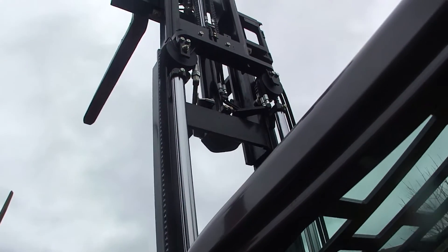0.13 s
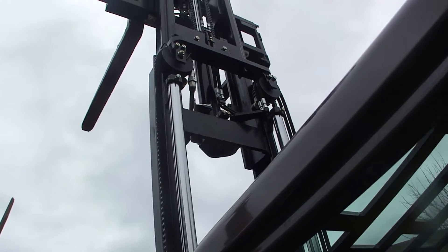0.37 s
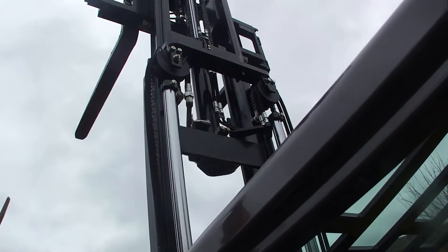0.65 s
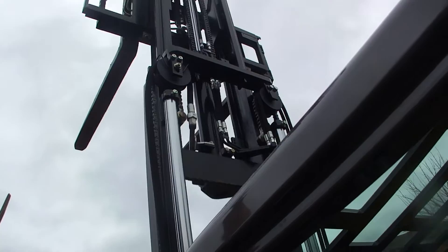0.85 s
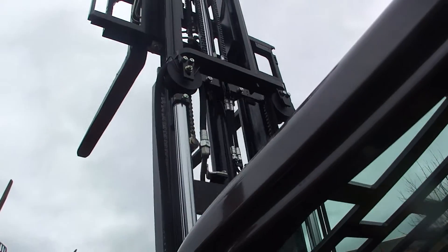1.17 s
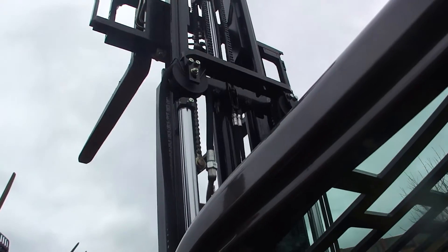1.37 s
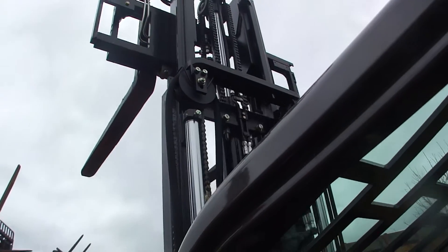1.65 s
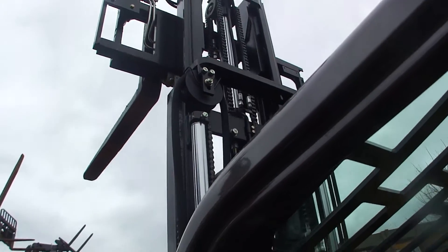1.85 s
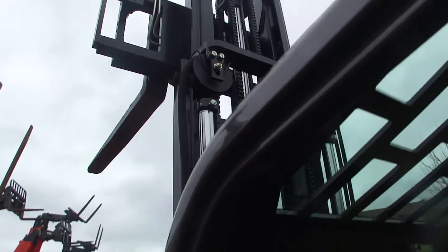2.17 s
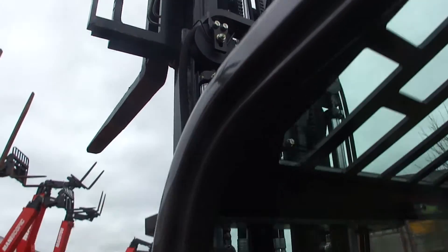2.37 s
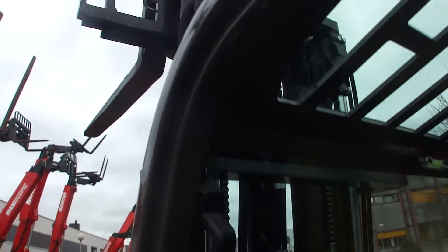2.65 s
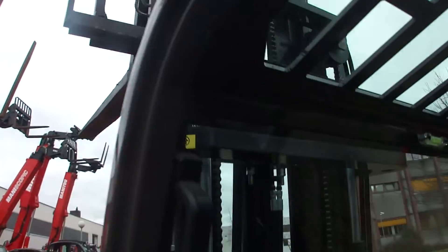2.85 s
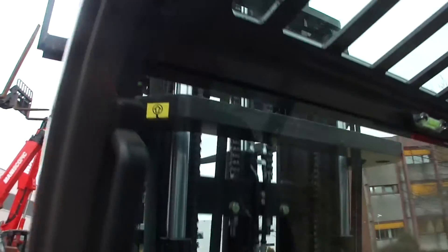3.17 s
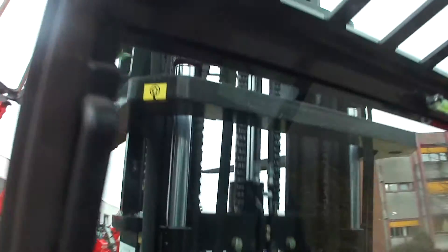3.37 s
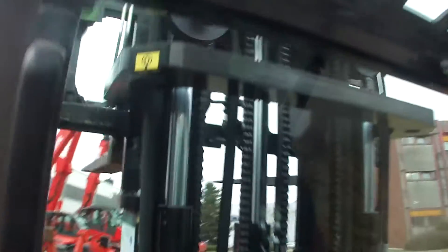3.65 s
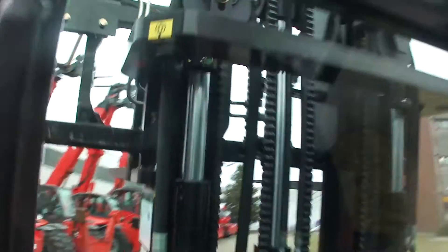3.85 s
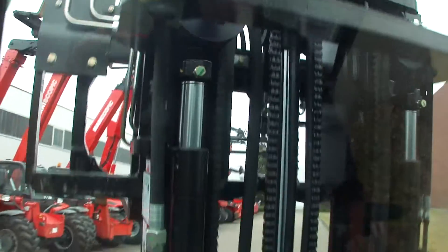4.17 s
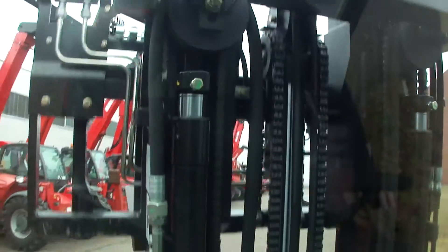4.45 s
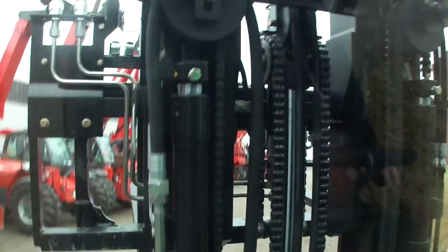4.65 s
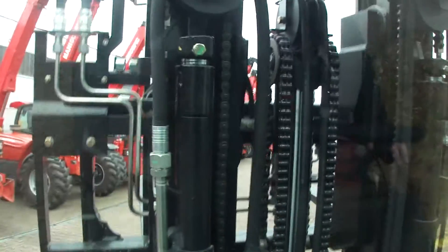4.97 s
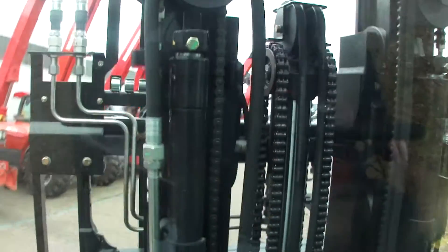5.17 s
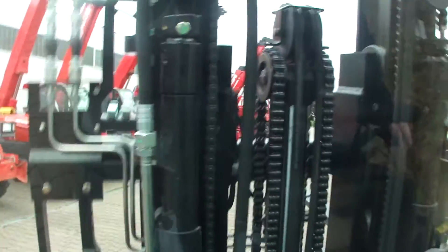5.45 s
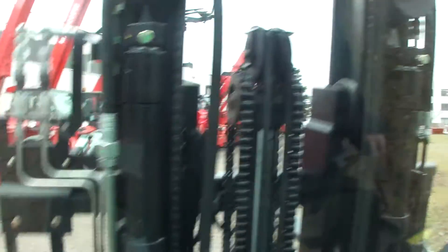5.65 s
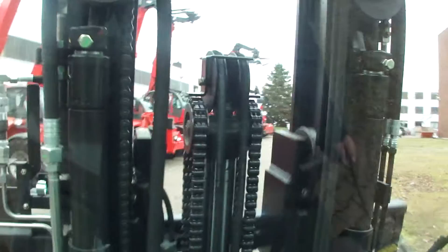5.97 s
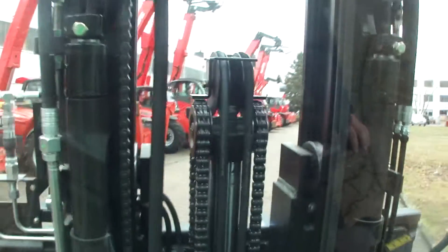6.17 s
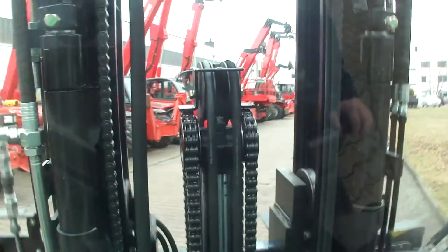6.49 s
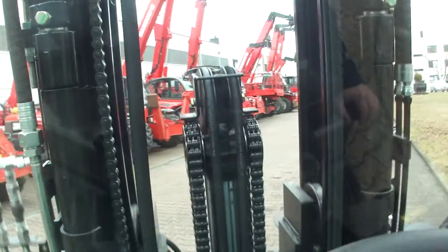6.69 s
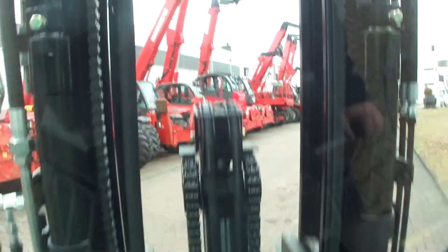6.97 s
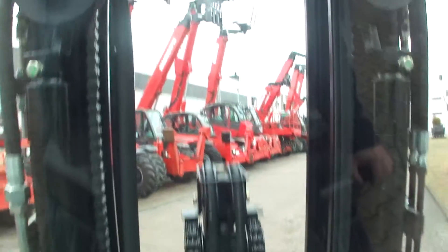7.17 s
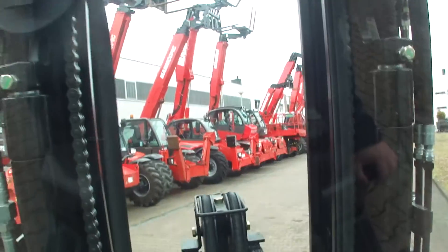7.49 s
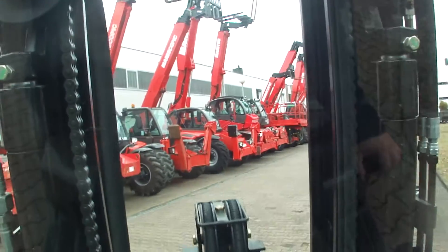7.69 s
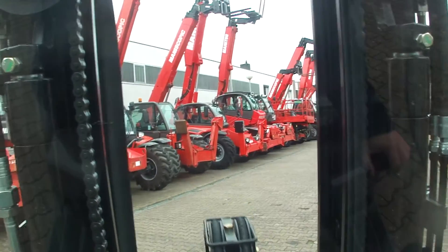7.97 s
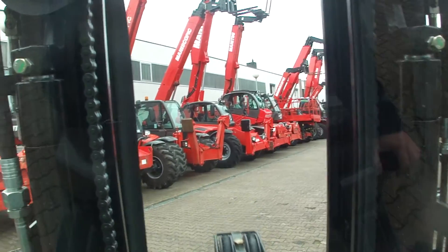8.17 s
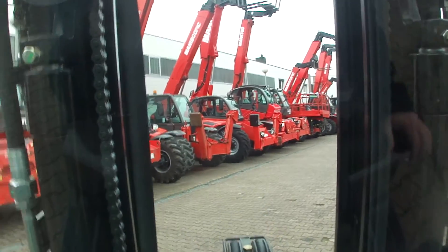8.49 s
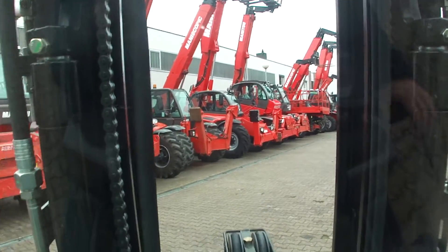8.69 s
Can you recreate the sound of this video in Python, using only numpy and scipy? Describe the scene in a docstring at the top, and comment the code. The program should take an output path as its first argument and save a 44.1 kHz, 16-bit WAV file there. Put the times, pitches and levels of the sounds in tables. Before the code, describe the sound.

Inside a forklift cab, a diesel engine drones and clatters while a panel knocks. The engine sags, the mast clanks once, then the engine pulls steadily under a hydraulic whine, faint oil hiss and small ticks. Midway it drops briefly to idle and picks up as a finger rubs and taps the hand-held microphone, dulling the right side. The mast whirs, and the engine revs higher in two steps.

```python
"""A diesel drone with clatter and a knocking panel fills a forklift's cab. The four-cylinder engine sags,
pulls, drops to idle and is revved again in steps; its tones and impacts are locked to the crankshaft.
The hydraulic pump whines, oil hisses in the valves, and the mast clanks, ticks and whirs. After five
seconds a finger slides over the right port of the hand-held camera, shading it and rubbing the case."""
import sys
import numpy as np
from scipy import signal
from scipy.fft import rfft, irfft
from scipy.io import wavfile
from scipy.ndimage import uniform_filter1d

SR = 44100
rng = np.random.default_rng(int(sys.argv[2]) if len(sys.argv) > 2 else 0)


def wav_out(sig):
    """Save sig, one row per channel (or a flat mono array), as 16-bit PCM at SR to the path in sys.argv[1]."""
    wavfile.write(sys.argv[1], SR, np.round(np.clip(np.atleast_2d(sig).T, -1, 1) * 32767).astype(np.int16))


N = 389399
TIME = np.arange(N) / SR
WORKING_HZ = 55  # firing rate at working speed

# Engine speed. Each row: time in seconds, firing rate in Hz.
FIRING_RATE = [(0, 50.2), (.16, 41.8), (.7, 42), (.92, 43.5), (1.13, 54.3), (1.5, 54.95), (2.3, 57),
               (3, 57.4), (4.57, 57.7), (4.93, 33.5), (5.14, 29.8), (5.37, 51.1), (6, 50.7), (7.62, 50.95),
               (7.83, 58.3), (8.32, 58.9), (8.6, 73.4), (8.83, 72.6)]
# Strain on the engine, high while the mast is worked. Each row: time in seconds, load in dB.
ENGINE_LOAD = [(0, -1.5), (1.2, 0), (2.4, -0.5), (3.3, -5), (4.8, -8.5), (5.15, -10.5), (7.6, -30),
               (8.2, -5), (8.83, -24)]
# Extra rumble as the truck gets rolling. Each row: time in seconds, gain in dB.
ROLLING_GAIN = [(0, 2.5), (3, -3.5), (4.9, 2), (5.7, 4), (7.1, 6.5), (8.4, 3.5), (8.83, -1)]
# Hiss of the oil flow. Each row: time in seconds, level in dB.
OIL_FLOW = [(0, -46), (1.1, -46), (2.7, -47), (3.4, -46), (3.9, -43.5), (4.6, -43.5), (5.05, -48),
            (5.6, -45), (7.2, -44), (8.83, -44)]


def undb(db):
    """Decibels to amplitude ratio."""
    return 10 ** (np.asarray(db) / 20)


def curves(table):
    """Linear interpolation in time of each column after the first."""
    times, *columns = np.transpose(table)
    return [np.interp(TIME, times, column) for column in columns]


def unit(x):
    """Normalisation to rms 1."""
    return x / np.sqrt(np.mean(x ** 2))


def colour(x, points):
    """Minimum-phase filter shaped by (Hz, dB) points; it keeps the power of white noise."""
    hz, db = np.transpose(points)
    size = 4096
    grid = np.maximum(np.fft.rfftfreq(size, 1 / SR), 1)
    rolloff_db = 20 * np.maximum(np.log2(grid / hz[-1]), 0)
    cepstrum = irfft(np.log(undb(np.interp(np.log(grid), np.log(hz), db) - rolloff_db)))
    cepstrum[1:size // 2] *= 2
    cepstrum[size // 2 + 1:] = 0
    response = irfft(np.exp(rfft(cepstrum)))
    return signal.oaconvolve(x, response[None] / np.linalg.norm(response), axes=1)[:, :N]


def walk(rate):
    """Slow fluctuation: random levels held 1 / rate seconds and smoothed twice; spread near 1."""
    hold = int(SR / rate)
    steps = np.repeat(rng.standard_normal(N // hold + 1), hold)
    return 1.72 * uniform_filter1d(uniform_filter1d(steps, hold), hold)[:N]


def noise(apart):
    """Partly coherent white noise at two ports; apart weights what they do not share."""
    return unit(rng.standard_normal(N) + apart * rng.standard_normal((2, N)))


def swells(table):
    """Gaussian envelopes; a half length is one standard deviation."""
    return sum(undb(db) * np.exp(-.5 * ((TIME - s) / half) ** 2) for s, half, db in table)


def blows(table):
    """Sudden onsets with exponential decay, 60 dB in one ring time."""
    return sum(undb(db - 60 * np.maximum(TIME - s, 0) / t60) * (TIME >= s) for s, db, t60 in table)


def tone(turns, db, wander):
    """Phase modulation: a sine of the given rms level, offset by wander in turns."""
    return np.sqrt(2) * undb(db) * np.sin(2 * np.pi * (turns + rng.random() + wander))


def resonate(x, hz, width):
    """Two equal resonators in cascade, scaled to rms 1."""
    mode = signal.iirpeak(hz, hz / width, SR)
    return unit(signal.lfilter(*mode, signal.lfilter(*mode, x)))


def octaves():
    """Engine speed in octaves above working speed."""
    return np.log2(curves(FIRING_RATE)[0] / WORKING_HZ)


def locked(order):
    """Nearest order (multiple of the firing rate) that is a harmonic of the four-firing cycle."""
    return np.round(order * 4) / 4


def impacts(cycle, scatter_db, slop_s, count):
    """Quasi-periodic impacts: parts strike at set angles of the cycle, with scatter in force and time."""
    drift = .15  # random step of the pattern per cycle, radians
    angle = (np.arange(count) + rng.random(count)) / count
    turns = np.arange(int(cycle[-1]))[:, None] + angle
    pattern = 2 * np.pi * rng.random(count) + drift * np.cumsum(rng.standard_normal(turns.shape), axis=0)
    at = (np.interp(turns, cycle, TIME) + slop_s * rng.standard_normal(turns.shape)) * SR
    force = np.tanh(2 * np.cos(pattern)) * undb(scatter_db * rng.standard_normal(turns.shape))
    train = np.zeros(N)
    np.add.at(train, np.clip(at.astype(int), 0, N - 1), force)
    return unit(train)


def engine_noise(firing):
    """Impact noise, amplitude-modulated by the firings: cab rumble, combustion clatter, injector rasp."""
    # Three spectra. Each row: frequency in Hz, relative level in dB.
    rumble_spectrum = [(30, -64.5), (70, -30.5), (135, -19), (175, -1.5), (235, 0), (310, -2), (420, -6.5),
                       (520, -20.5), (800, -40)]
    clatter_spectrum = [(50, -67.5), (300, -37), (440, -6), (560, -1.5), (680, -7.5), (790, -1.5),
                        (950, -8.5), (1150, -13.5), (1700, -56)]
    rasp_spectrum = [(100, -69), (700, -31), (1020, -2), (1350, -1.5), (1600, -4.5), (1950, -5.5),
                     (2350, -14.5), (2800, -23), (3500, -33.5), (4700, -35.5), (7000, -71)]
    speed, load_db, flow_db = octaves(), curves(ENGINE_LOAD)[0], curves(OIL_FLOW)[0]
    rumble_db = -25 + 9.5 * speed + curves(ROLLING_GAIN)[0] * (1 + .25 * walk(25))
    clatter_db = -24.5 + 3 * speed + .036 * load_db
    rasp_db = -29 - 1.5 * speed + .54 * (flow_db - flow_db.mean()) + .11 * load_db
    throb = 1 + .11 * np.cos(2 * np.pi * firing)
    rumble = noise(.069) + .5 * impacts(firing / 4, scatter_db=3.5, slop_s=.0004, count=16)
    clatter = noise(.45) + 1.35 * impacts(firing / 4, scatter_db=3.3, slop_s=.00005, count=24)
    rasp = noise(.9) + 1.15 * impacts(firing / 4, scatter_db=2.2, slop_s=.00003, count=64)
    return (unit(colour(throb * rumble, rumble_spectrum)) * undb(rumble_db)
            + unit(colour(throb * clatter, clatter_spectrum)) * undb(clatter_db)
            + unit(colour(throb * rasp, rasp_spectrum)) * undb(rasp_db))


def cab_resonance_db(order):
    """Cavity resonance: the cab's air modes lift an engine order that passes through them."""
    # Each row: frequency in Hz, half width in Hz, lift in dB.
    air_modes = [(103.9, 3.8, 7.5), (152.7, 6, 8), (198, 18, 6), (313.7, 39, 13), (600, 46, 9)]
    rates = np.arange(25, 80, .25)
    lift = sum(db * np.exp(-.5 * ((order * rates - hz) / half) ** 2) for hz, half, db in air_modes)
    return np.interp(curves(FIRING_RATE)[0], rates, lift)


def drones(firing):
    """Periodic forcing: firing harmonics and the pump's tone grow with speed and waver as it changes."""
    # Each row: order, base level in dB, rise in dB per octave of speed.
    firing_orders = [(1, -55.5, 28), (2, -44, 15.5), (3, -46, 0.5), (6, -36, 6), (12, -37.5, 11)]
    # Least unsteadiness of the tones. Each row: time in seconds, amount from 0 to 1.
    unsteadiness = [(0, .55), (1.05, .55), (1.3, .05), (4.55, 0), (4.75, .35), (5.2, .35), (5.4, .05),
                    (6.6, .05), (7.5, .2), (7.9, .5), (8.83, .7)]
    # The camera moves through the cab's standing waves.
    # Each row: time in seconds, then lift in dB of order 6, of order 12 and of the pump's tone.
    standing_waves = [(0, -14, 6, -1), (1.05, -4, 3, 2.5), (1.25, -1, 2, -1), (2.3, -1, 2, -0.5),
                      (2.9, 3, 8, 3), (3.7, 3.5, -10, 0.5), (4.6, -0.5, 2.5, -12), (5.1, 9.5, -6, -2),
                      (5.4, 4, -1, 6), (6.5, 3.5, 1.5, 6.5), (7.1, -3.5, 3, 5), (7.58, -1, 4.5, 0),
                      (7.7, -8, -5, 3), (7.8, 3.5, 1, 7), (8.3, 2.5, 3, 7.5), (8.55, 1, -3, 5.5),
                      (8.83, 5.5, -3, -2)]
    pump_order, speed = 4.385, octaves()
    hz_per_s = np.abs(np.gradient(curves(FIRING_RATE)[0])) * SR
    surge = np.tanh(uniform_filter1d(hz_per_s, size=4000) / 40)
    rough = np.maximum(.5 * surge, curves(unsteadiness)[0])
    sixth_db, twelfth_db, pump_db = curves(standing_waves)
    lift_db = {2: .49 * curves(ROLLING_GAIN)[0], 6: sixth_db, 12: twelfth_db}
    voices = [(order, db + rise_db * speed + cab_resonance_db(order) + lift_db.get(order, 0))
              for order, db, rise_db in firing_orders]
    voices.append((pump_order, -33 + 6 * speed + pump_db + 2 * walk(6)))
    sound = 0
    for order, db in voices:
        flutter_db = (.6 + 3 * rough) * np.tanh(walk(28))
        wander = (.025 + .08 * rough) * min(order / 6, 1) * walk(30)
        sound += tone(order * firing, db + flutter_db, wander)
    return sound


def singing_tones(firing):
    """Forced vibration: engine tones and the pump's overtone sing under load; some swell."""
    # Each row: order, base level in dB at full load. Order 8.75 is the pump's second harmonic.
    singing_orders = [(8.75, -37), (9.5, -39.5), (10, -47.5), (10.5, -42), (10.75, -44), (11, -41),
                      (11.5, -42), (13.25, -40.5), (14, -35.5), (15.25, -39.5), (16, -45.5), (20, -54)]
    # Passing whines. Each row: centre and half length in seconds, order, level in dB.
    whines = [(.5, .39, 4, -36), (1, 0.17, 8.75, -30), (1.5, .3, 11, -33), (1.5, .3, 12, -39),
              (2.35, 0.34, 24, -36), (2.3, 0.31, 10.5, -27.5), (2.5, 0.19, 18, -33.5), (2.6, .35, 11, -32),
              (2.6, 0.33, 13.25, -33), (2.7, 0.57, 8.75, -30.5), (3.3, 0.85, 9.75, -29),
              (3.55, 0.37, 24, -33.5), (3.8, 0.37, 19, -35), (3.8, 0.35, 15.25, -34), (4, .4, 13, -38),
              (4, .35, 20, -41), (3.85, 0.12, 60, -58), (4.1, 0.59, 36, -41.5), (4.4, 0.12, 24, -36),
              (4.947, .092, 19.5, -32), (6.3, 0.26, 39, -40), (6.2, 0.45, 27, -43), (6.3, 0.65, 17.25, -36),
              (6.4, .8, 10.5, -39), (6.8, .8, 4, -37), (6.9, .5, 18, -43), (8.12, 0.18, 10.5, -32),
              (8.47, .043, 4, -21.5), (8.8, 0.049, 4, -26)]
    drive_db = .35 * curves(ENGINE_LOAD)[0] - 39 * octaves() ** 2  # strongest near working speed
    power = {locked(order): undb(db + drive_db + cab_resonance_db(locked(order))) ** 2
             for order, db in singing_orders}
    for s, half, order, db in whines:
        power[locked(order)] = power.get(locked(order), 0) + swells([(s, half, db)]) ** 2
    return sum(np.sqrt(p) * tone(order * firing, db=1.3 * walk(8), wander=.06 * walk(10))
               for order, p in power.items())


def panel(firing):
    """Impact excitation: a panel, slapped hard once a cycle and lightly between, rings and buzzes."""
    # Each row: angle in turns of the cycle, relative force in dB, rise in dB per octave of speed.
    slap_pattern = [(.06, -11, 18), (.3, -8, 22), (.512, 0, 0), (.82, -13, -3)]
    # Each row: frequency in Hz, relative level in dB.
    panel_response = [(40, -73), (150, -38), (350, 1.5), (460, -3), (590, -4), (670, -19), (780, -10.5),
                      (1000, -22), (1500, -32), (3000, -59)]
    # Each row: frequency and resonator width in Hz, level at full load in dB, dB per octave of speed.
    panel_modes = [(575, 36, -34, -7), (630, 28, -35.5, -3), (600, 170, -25.5, 2.5), (800, 200, -32, 22)]
    speed, load_db = octaves(), curves(ENGINE_LOAD)[0]
    lag = .045 * speed  # turns: the slaps land later at higher speed
    slaps, rattling = 0, 0
    for angle, db, rise_db in slap_pattern:
        since = (firing / 4 - angle - lag) % 1
        force = undb(db + rise_db * speed + 1.2 * walk(25))
        slaps += force * (np.diff(since, prepend=since[0]) < 0)
        rattling += force * np.exp(-since / .1)
    buzz = unit(rattling * impacts(firing / 4, scatter_db=2.5, slop_s=.00009, count=192))
    knock = unit(unit(slaps) + .45 * buzz) * undb(-29 + 15 * speed + load_db)
    tremble = rng.standard_normal(N) * undb(-34 + .56 * load_db)
    rings = sum(resonate(slaps, hz, width) * undb(db + rise_db * speed + load_db)
                for hz, width, db, rise_db in panel_modes)
    return colour((knock + tremble)[None], panel_response) + rings


def oil_and_chain():
    """Flow noise: oil hisses in the valves; the lift chain's ticks are decaying bursts in the same band."""
    # Each row: frequency in Hz, relative level in dB.
    hiss_spectrum = [(2500, -2.5), (3400, -6), (4600, -10.5), (5700, 0.5), (7200, 2), (9000, 0),
                     (10500, -7), (11500, -20.5)]
    # Each row: start in seconds, level in dB, ring time in seconds.
    chain_ticks = [(.875, -42, .03), (1, -42, .03), (1.061, -38, 0.032), (1.735, -42, 0.043),
                   (1.89, -38, .04), (7.13, -34, .04), (7.379, -36, 0.1), (8.042, -39, 0.032)]
    hiss = noise(2.6) * (undb(curves(OIL_FLOW)[0] + .5 * walk(40)) + blows(chain_ticks))
    return colour(hiss, hiss_spectrum)


def port_notches(sound):
    """Band rejection: the camera hears the cab through three deep notches in the treble."""
    # Each row: frequency in Hz, width in Hz of each of two stages.
    notch_bands = [(3000, 300), (4020, 346), (5020, 374)]
    for hz, width in notch_bands:
        notch = signal.iirnotch(hz, hz / width, SR)
        sound = signal.lfilter(*notch, signal.lfilter(*notch, sound))
    return sound


def cab_shudder():
    """Transient response: the cab shudders in a low band at three sharp changes of speed."""
    # Each row: centre and half length in seconds, level in dB.
    shudders = [(.1, .035, -46), (4.73, .05, -34), (5.24, 0.051, -27)]
    # Each row: frequency in Hz, relative level in dB.
    shudder_spectrum = [(30, -44), (60, -20), (88, 27), (110, 5), (170, -28)]
    return colour(noise(.12) * swells(shudders), shudder_spectrum)


def valve_spurts():
    """Flow noise swells briefly as oil spurts through a valve."""
    # Each row: centre and half length in seconds, level in dB.
    spurts = [(.41, 0.039, -41), (5.24, 0.052, -44.5)]
    # Each row: frequency in Hz, relative level in dB.
    spurt_spectrum = [(4500, -16), (6000, -7), (6800, 1), (8000, -10), (11000, -25)]
    return colour(noise(.88) * swells(spurts), spurt_spectrum)


def clank_and_click():
    """Exponential decay: the mast clanks near 0.58 s; a short sharp click sounds at 1.43 s."""
    # Each row: start in seconds, level in dB, ring time in seconds.
    burst_times = [(.576, -14, .03), (.5805, -10, .008), (.583, -16.5, .08), (1.431, -24, .008)]
    # Each row: frequency in Hz, relative level in dB.
    burst_spectrum = [(40, -67), (400, -11), (750, 5), (1150, 7), (1400, 5), (1600, 5), (1850, 9),
                      (2100, 0), (2400, -9), (3500, -28), (7000, -27), (11000, -35)]
    return colour(noise(.24) * blows(burst_times), burst_spectrum)


def sharp_clicks():
    """Broadband transients a few milliseconds long are heard as sharp little clicks."""
    # Each row: start in seconds, level in dB, ring time in seconds.
    click_times = [(.5805, -32, .006), (1.286, -35, .005), (1.431, -35, .005), (1.89, -41, .005),
                   (8.488, -47, .006)]
    # Each row: frequency in Hz, relative level in dB.
    click_spectrum = [(500, -20), (2000, 0), (3500, 0), (5000, -2), (7000, -8), (11000, -16)]
    return colour(noise(.99) * blows(click_times), click_spectrum)


def carriage_whir():
    """Narrow-band noise has a pitch: the mast whirs as its carriage runs down."""
    # Each row: centre and half length in seconds, level in dB.
    whirs = [(4.86, 0.13, -32.5), (6.3, 0.53, -27)]
    # Each row: frequency in Hz, relative level in dB.
    whir_spectrum = [(600, -45), (800, -11.5), (860, -5), (900, -1), (950, -14.5), (1200, -38)]
    return colour(noise(.69) * swells(whirs), whir_spectrum)


def finger_cover(sound):
    """Shadowing and friction: a finger shuts sound out of the right port and rubs on the case."""
    # Each row: time in seconds, covered share of the port from 0 to 1.
    covered_share = [(0, 0.04), (4.95, 0), (5.05, 0.5), (5.2, 0.68), (5.4, 0.9), (8.83, 0.82)]
    # Each row: centre and half length in seconds, level in dB.
    rubs = [(5.24, 0.072, -17.5), (6, 0.065, -20.5), (6.45, 0.036, -32), (6.95, 0.079, -41)]
    # Each row: frequency in Hz, relative level in dB.
    rub_spectrum = [(30, -26), (80, 0.5), (200, 10), (500, 3.5), (1200, -3), (2200, -16), (3500, -36),
                    (8000, -45), (11000, -55)]
    left, right = sound
    cover, = curves(covered_share)
    # The camera's stereo widening leaves the covered side a weak inverted copy of the open one.
    crossfeed = signal.lfilter(*signal.butter(1, 3500, fs=SR), left)
    right = (1 - cover) * undb(2.5) * right - cover * undb(-8) * crossfeed
    # Bass passes the finger and reaches both ports through the case.
    bass = cover * undb(-4) * signal.lfilter(*signal.butter(2, 130, fs=SR), left)
    friction = colour(noise(.64) * (swells(rubs) + cover * undb(-29)), rub_spectrum)
    return np.array([left, right]) + bass + friction * np.array([[-.4], [.9]])


def finger_tap():
    """Impulse response of the case: the finger taps it, with quick bounces."""
    # Each row: time in seconds, strength in dB.
    bounces = [(5.297, 5), (5.2975, 4.5), (5.2995, .5)]
    # Each row: frequency in Hz, relative level in dB.
    case_response = [(30, -20), (100, 0), (1000, 3), (2200, 2.5), (3200, -6), (4500, -5), (6000, -17),
                     (11000, -21)]
    contacts = sum(undb(db) * signal.unit_impulse(N, int(s * SR)) for s, db in bounces)
    return colour(contacts[None], case_response) * np.array([[-.2], [.9]])


def level_dip():
    """Attenuation: the level dips briefly after the tap."""
    # Each row: time in seconds, gain in dB.
    dip_gain = [(5.3, 0), (5.304, -15), (5.314, -9), (5.329, 0)]
    return undb(curves(dip_gain)[0])


def loose_part():
    """A gradual onset softens a transient: a loose part clacks gently."""
    # Each row: centre and half length in seconds, level in dB.
    clack_times = [(7.385, .011, -39)]
    # Each row: frequency in Hz, relative level in dB.
    clack_spectrum = [(800, -24), (2200, 7), (3300, 2), (4500, -7), (7000, -18), (11000, -8)]
    return colour(noise(1) * swells(clack_times), clack_spectrum)


def scene():
    """Superposition at the camera's two ports; everything that turns follows the crankshaft."""
    firing = np.cumsum(curves(FIRING_RATE)[0]) / SR  # firings so far, four to a cycle
    cab = cab_shudder() + engine_noise(firing) + drones(firing) + singing_tones(firing) + panel(firing)
    cab += oil_and_chain() + clank_and_click() + carriage_whir() + valve_spurts() + loose_part()
    return (port_notches(finger_cover(cab)) + finger_tap() + sharp_clicks()) * level_dip()


def record(dry):
    """Band limiting: the camera's steep low-pass filter cuts the top."""
    top_hz = 11400
    return signal.sosfilt(signal.ellip(8, .2, 70, top_hz, fs=SR, output="sos"), dry)


dry = scene()
out = record(dry)
wav_out(out)
```